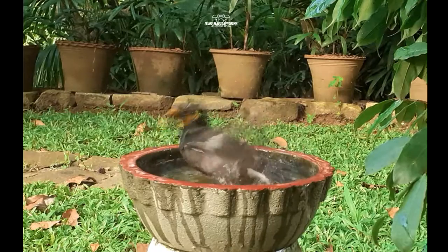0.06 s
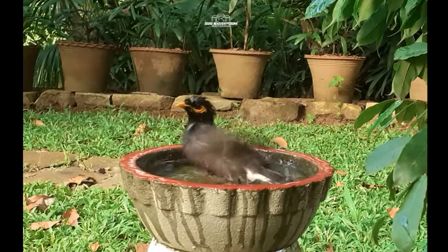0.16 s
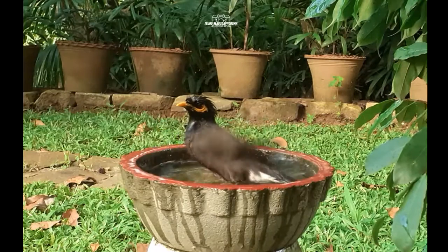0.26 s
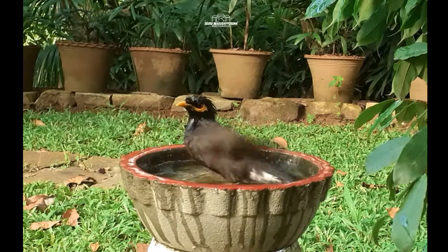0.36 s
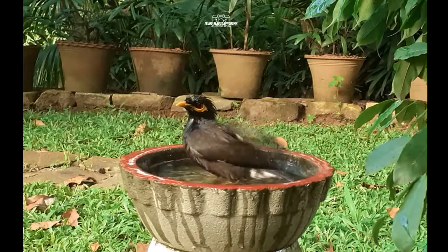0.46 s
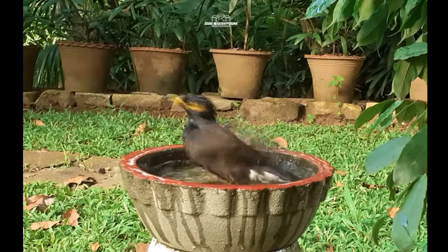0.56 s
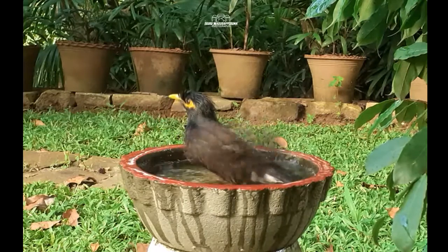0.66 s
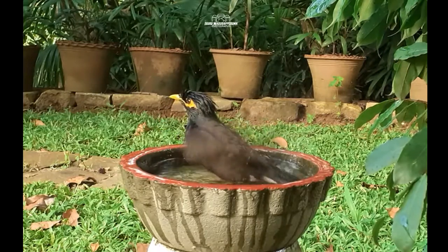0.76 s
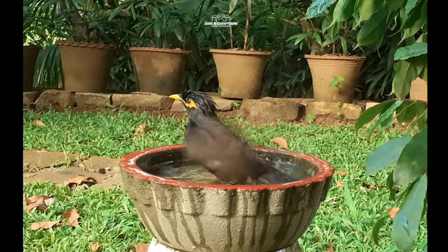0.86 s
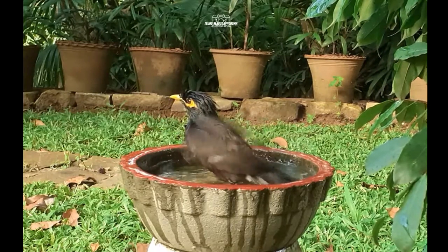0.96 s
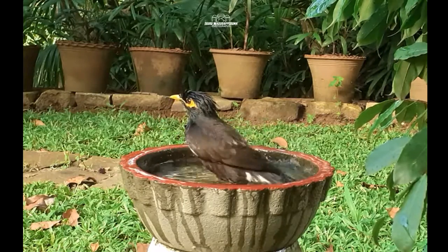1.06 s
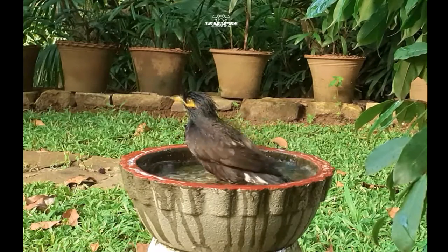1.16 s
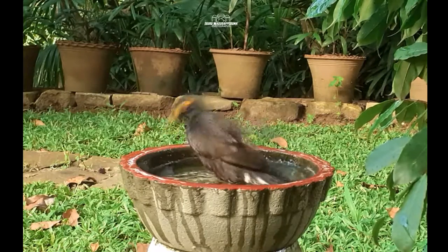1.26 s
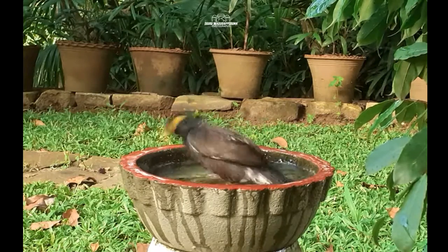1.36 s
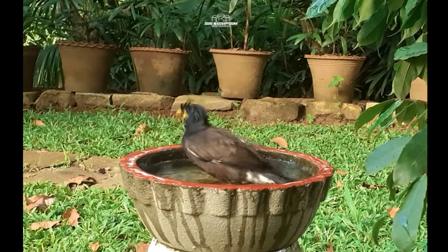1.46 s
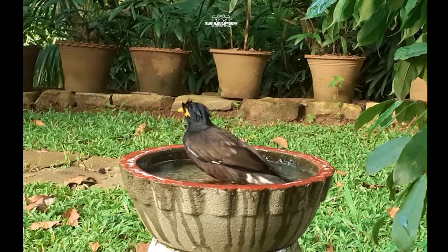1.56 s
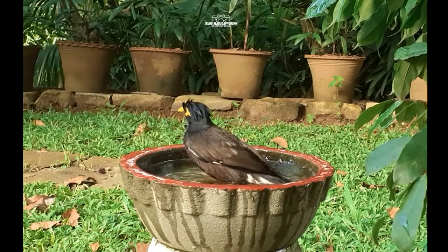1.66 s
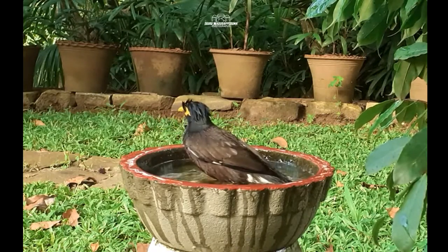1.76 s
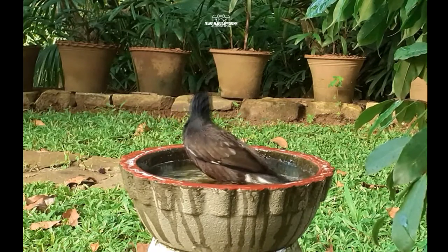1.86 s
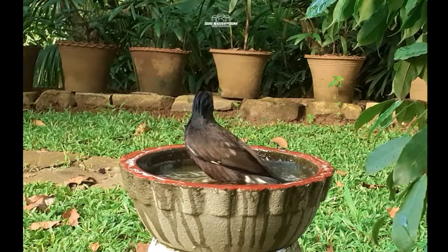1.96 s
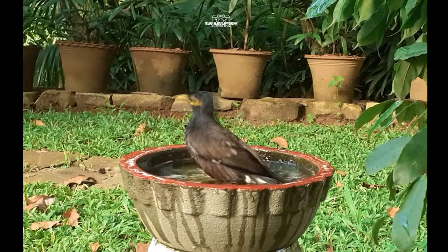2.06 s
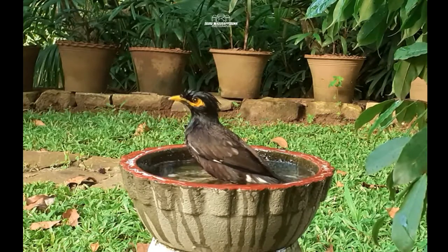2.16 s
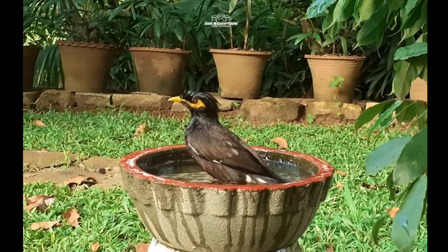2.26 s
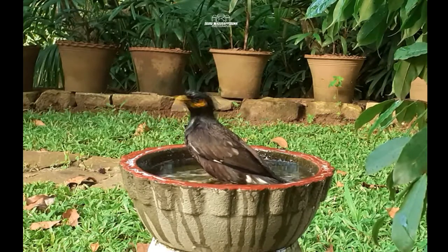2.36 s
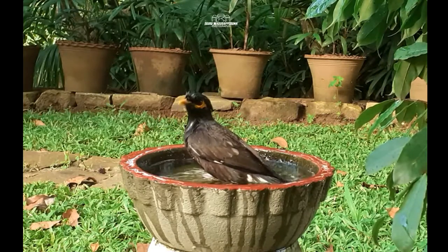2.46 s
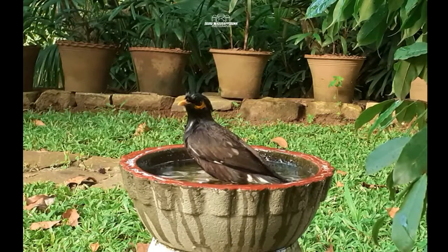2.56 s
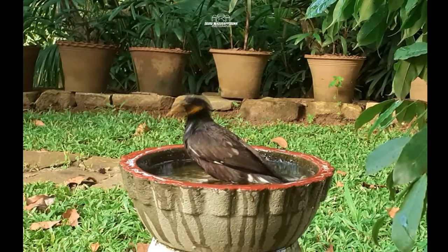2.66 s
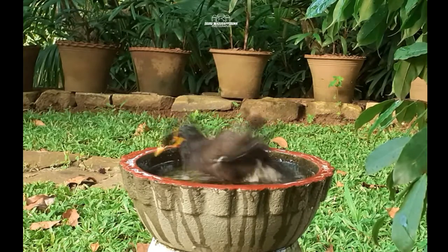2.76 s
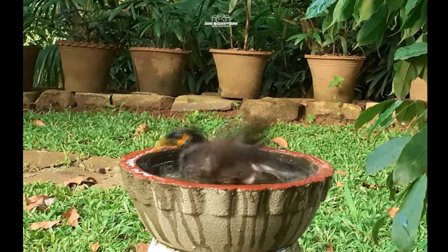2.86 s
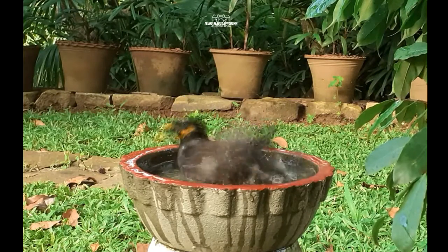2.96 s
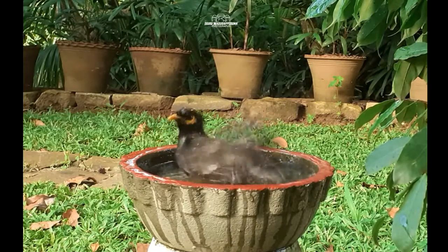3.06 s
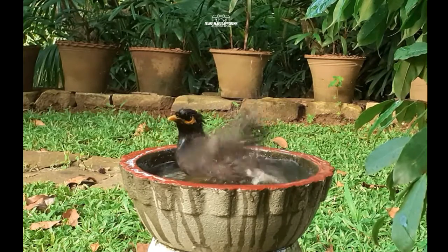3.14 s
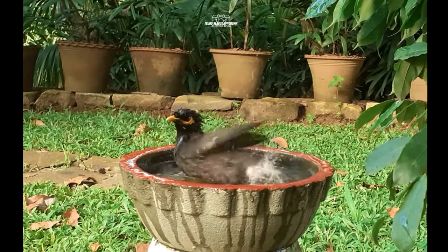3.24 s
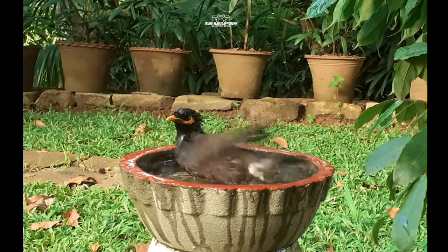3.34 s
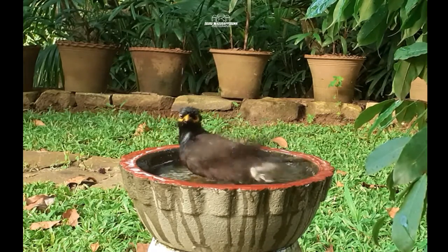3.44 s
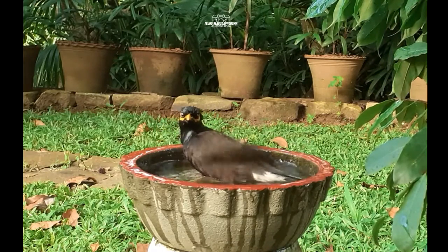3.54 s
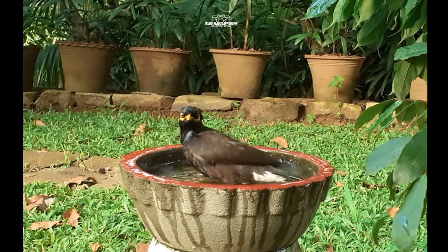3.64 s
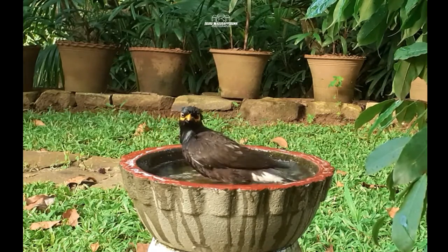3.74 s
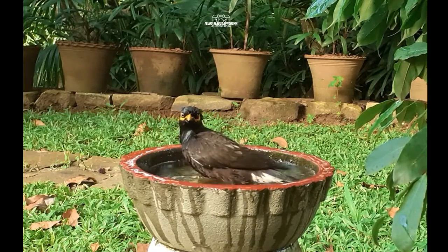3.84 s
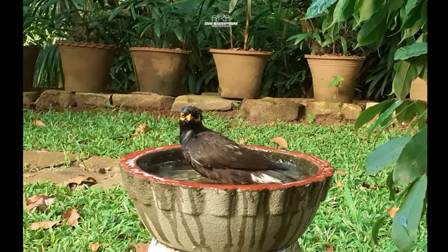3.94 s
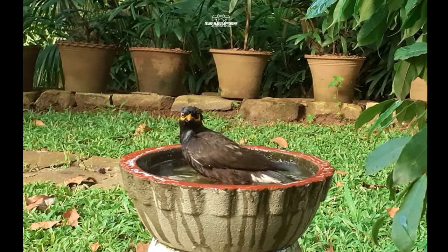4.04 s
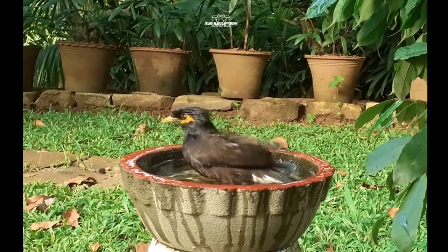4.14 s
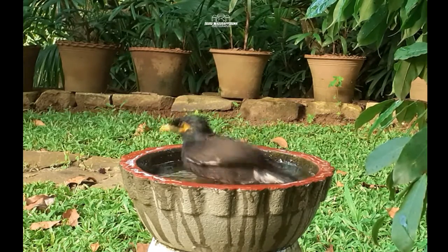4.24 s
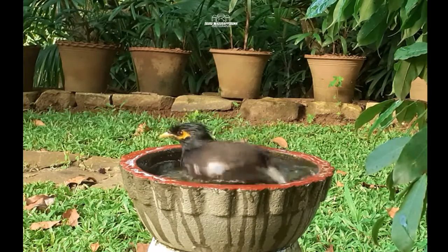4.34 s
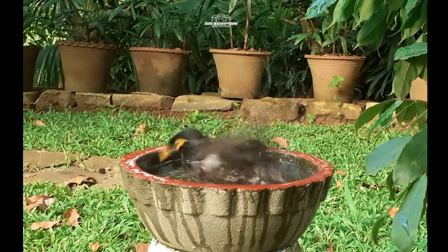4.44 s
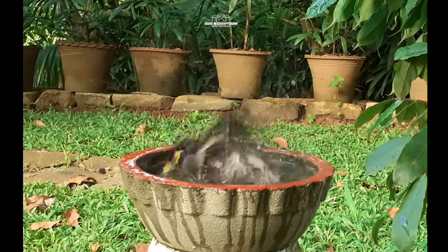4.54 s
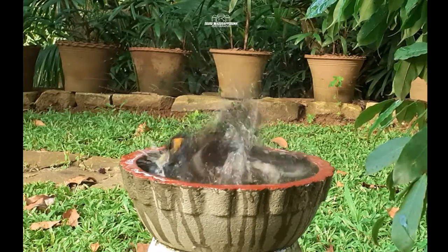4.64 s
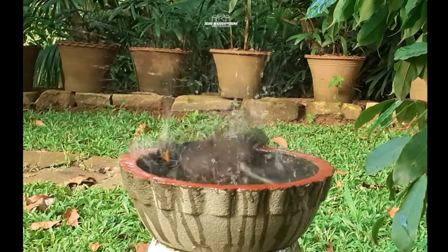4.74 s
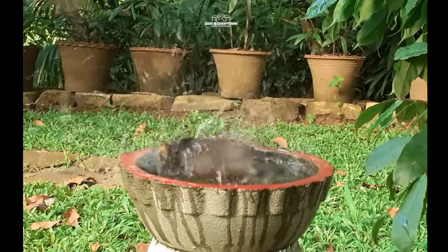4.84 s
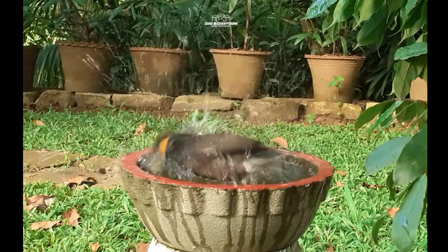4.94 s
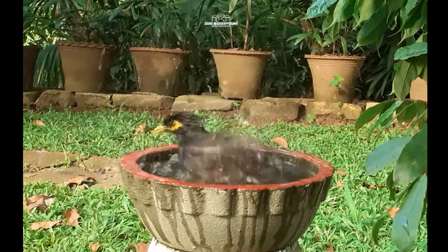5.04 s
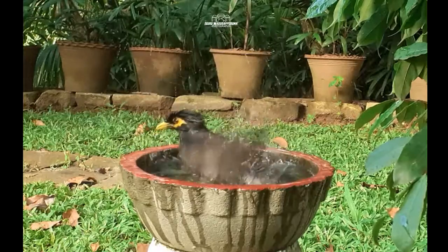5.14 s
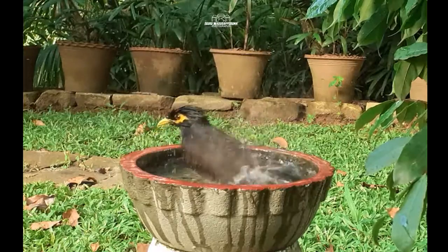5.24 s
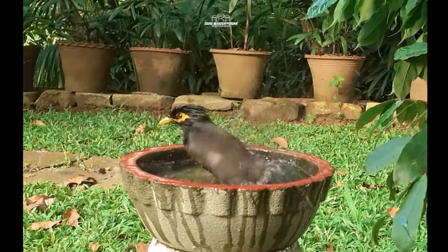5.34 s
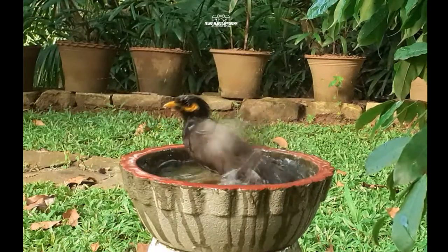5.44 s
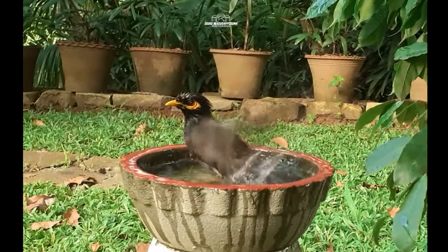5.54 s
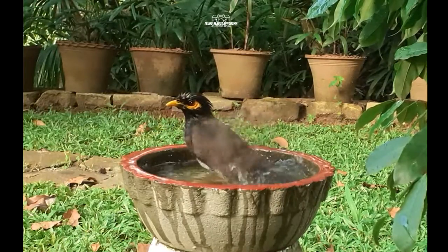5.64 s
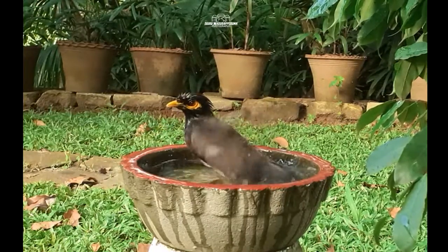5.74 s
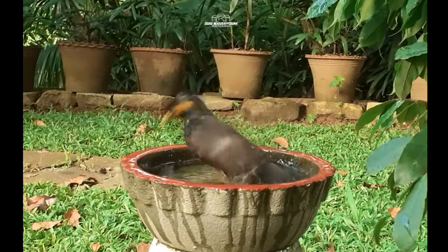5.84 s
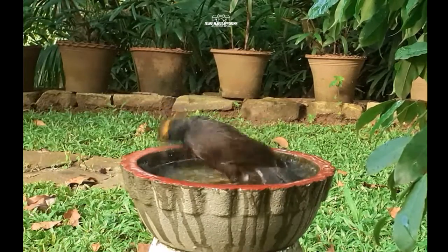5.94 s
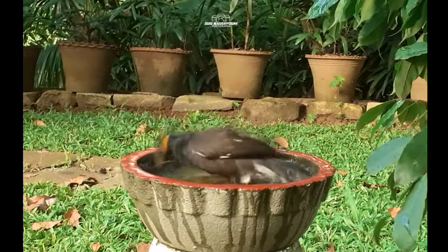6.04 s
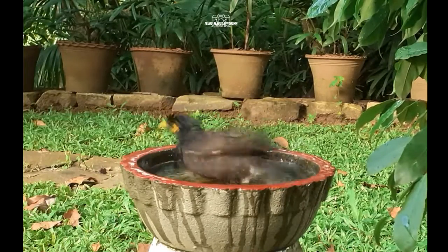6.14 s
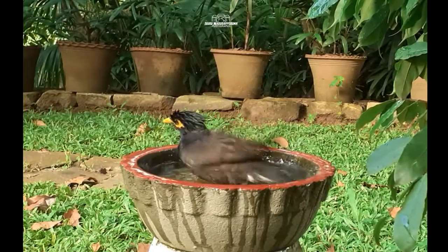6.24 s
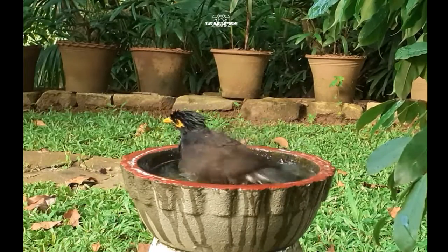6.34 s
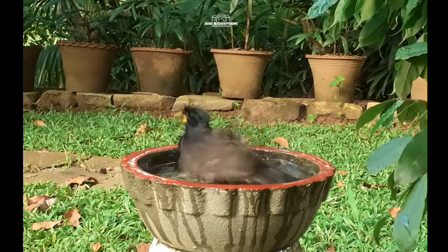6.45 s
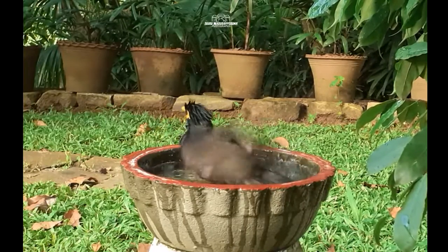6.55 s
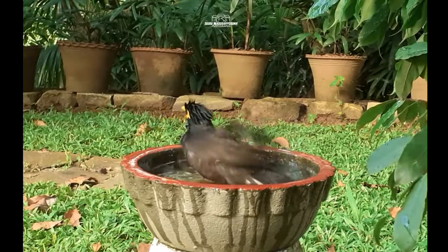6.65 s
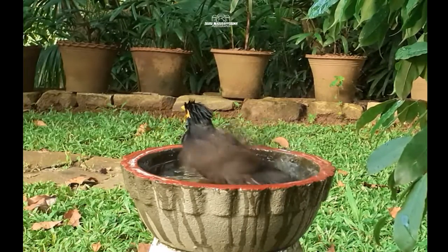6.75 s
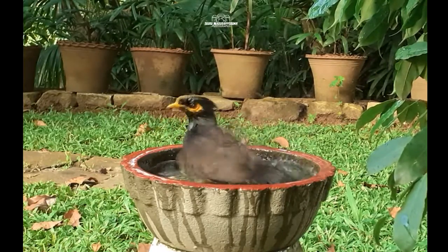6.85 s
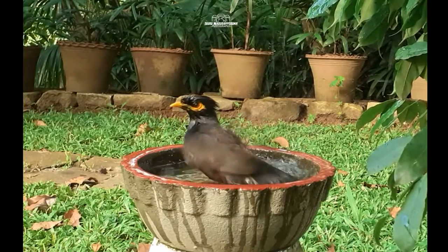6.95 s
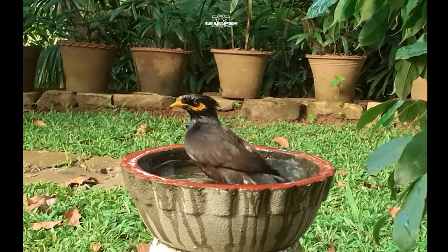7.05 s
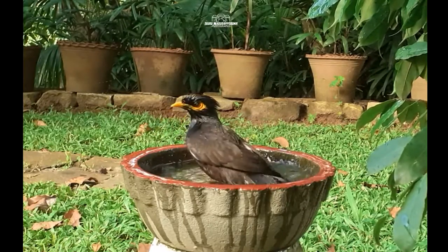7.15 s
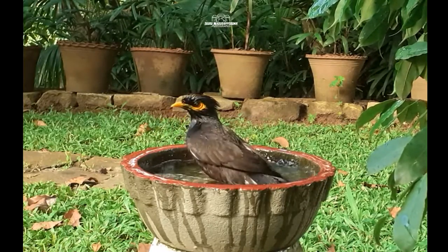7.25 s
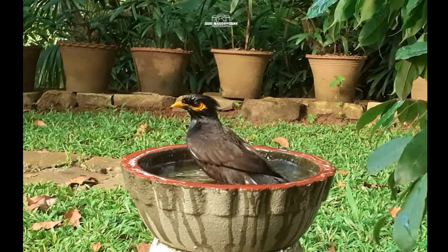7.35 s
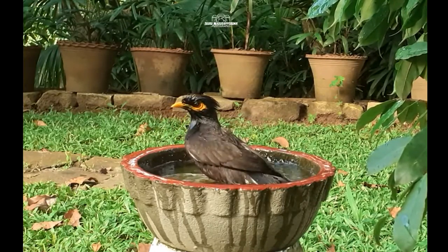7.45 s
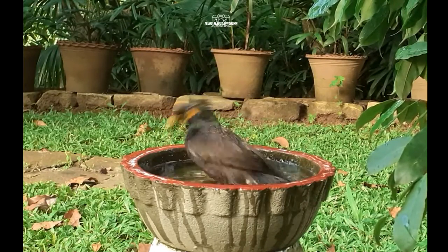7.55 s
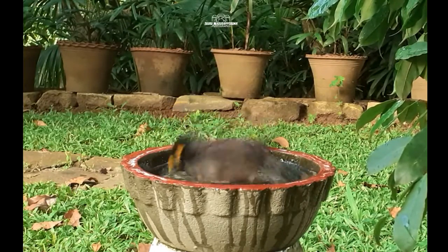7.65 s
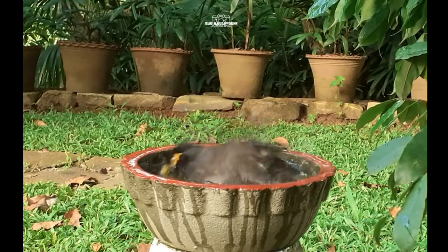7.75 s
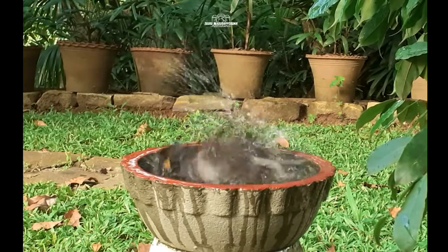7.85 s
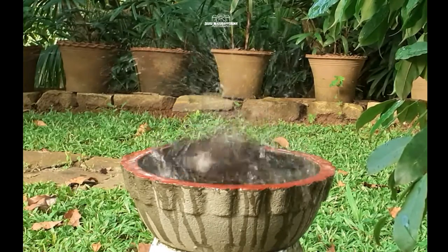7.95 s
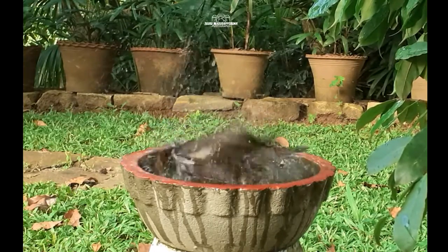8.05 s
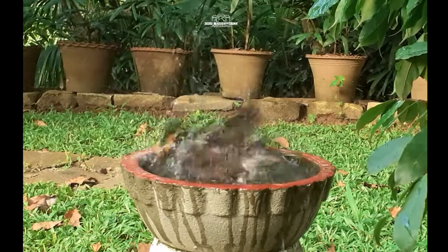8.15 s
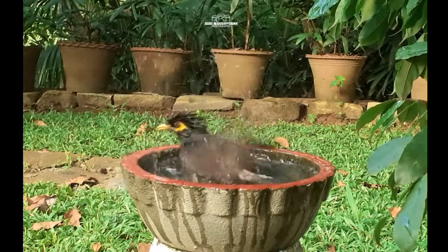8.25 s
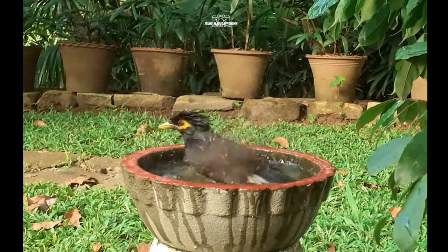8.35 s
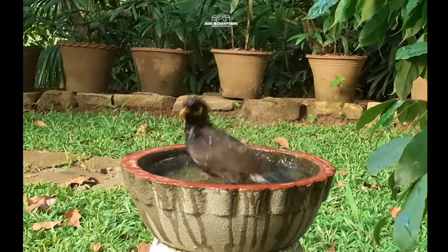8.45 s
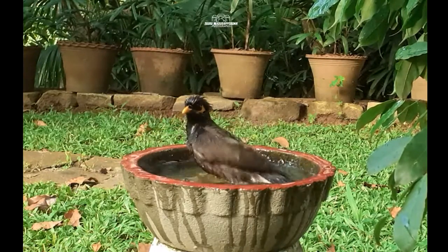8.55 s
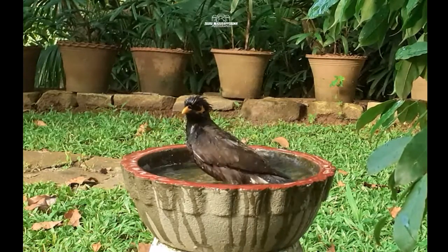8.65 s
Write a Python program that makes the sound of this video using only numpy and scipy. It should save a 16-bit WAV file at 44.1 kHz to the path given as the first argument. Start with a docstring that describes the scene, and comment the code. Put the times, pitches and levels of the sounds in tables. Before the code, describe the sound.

Quick wet wing flutters and bright spray burst from a small basin, with pauses showing faint animal hoots, bird piping and insect hiss.

```python
"""A myna bathes in a garden bird bath: its wings slap the water about twelve times a second, in bouts.
Slaps, thumps and spray are shaped noise; drops, bubbles and air pockets are damped, rising sines.
Far animals hoot (tones roughened by a random flutter); small birds chirp and pipe in the trees (gliding sines).
Insects hiss high over a low town rumble (filtered noise), with a far motor and passing traffic."""
import sys
import numpy as np
from scipy import signal
from scipy.fft import rfft, irfft, next_fast_len
from scipy.io import wavfile
from scipy.ndimage import uniform_filter1d, map_coordinates

SR = 44100
rng = np.random.default_rng(int(sys.argv[2]) if len(sys.argv) > 2 else 0)


def wav_record(signal):
    """Record a signal, one row per channel, as 16-bit PCM in the file named by sys.argv[1]."""
    frames = np.transpose(np.atleast_2d(signal))
    bounded = np.clip(frames, -1, 1)
    # unit amplitude maps onto the largest positive 16-bit level
    quanta = np.round(bounded * 32767).astype(np.int16)
    wavfile.write(sys.argv[1], SR, quanta)


N = 383661  # length in samples

# wing beats on the water; levels before the final mix: start_s, level_db, thump_db (against the beat)
WING_BEATS = [(0.049, -34.5, -14), (0.157, -44, -12.5), (0.326, -55, -19), (0.4373, -43.5, -13),
              (0.6973, -37.5, -16), (0.782, -31.5, -17.5), (0.7995, -35, -22), (0.8664, -31, -17.5),
              (.8823, -33, -19), (0.9639, -30, -16), (2.9773, -42.5, -19), (3.247, -31, -28),
              (4.5822, -47, -19), (4.679, -33, -25), (4.789, -33, -28), (4.842, -26, -24.5),
              (4.8989, -27, -30), (4.9534, -37, -21), (5.0232, -28.5, -80), (5.1423, -32.5, -17),
              (5.163, -28.5, -18), (5.2251, -29.5, -16), (5.3, -36, -21), (5.3944, -34, -17),
              (5.4016, -30, -14), (5.4731, -22.5, -21.5), (5.551, -21.5, -18), (5.628, -23, -17.5),
              (5.7105, -23, -19.5), (5.7873, -19.5, -23), (5.8749, -21, -19), (5.9735, -33.5, -16.5),
              (6.486, -33.5, -22), (6.574, -27, -28), (6.6442, -36.5, -14.5), (6.722, -42, -14),
              (6.8103, -35, -18), (6.884, -40, -15), (6.8986, -31, -18.5), (6.9721, -35.5, -18),
              (7.0911, -40, -52), (7.7131, -38, -18), (7.903, -26, -27), (7.965, -36, -22),
              (8.0914, -28, -28), (8.142, -26.5, -29)]
# spectrum of the water moving in the bowl: frequency_hz, level_db
BOWL_WATER = [(70, -16), (150, 3), (280, 4), (420, -8.5), (600, 6.5), (900, 7), (1200, -4), (1650, 4),
              (2400, -6.5), (4000, -25.5)]
# sound rattling between water and rim: frequency_hz, t60_s
BOWL_DECAY = [(500, 0.031), (4000, 0.18), (12000, 0.023)]
# sound scattered among the trees: frequency_hz, t60_s
TREE_DECAY = [(400, 0.57), (2500, 0.55), (8000, 0.2)]


def amp(db):
    """Level definition: decibels to amplitude gain."""
    return 10 ** (np.asarray(db) / 20)


def unit(x):
    """Normalisation: scale to rms 1."""
    return x / np.sqrt(np.mean(x ** 2) + 1e-20)


def along(points, hz):
    """Logarithmic interpolation: (Hz, value) points joined on a log frequency axis."""
    f, v = np.transpose(points)
    return np.interp(np.log(hz + 1), np.log(f + 1), v)


def wobble(rate):
    """Slow random modulation: a smooth curve through `rate` random knots a second."""
    knots = rng.standard_normal(int(N * rate / SR) + 4)
    return map_coordinates(knots, [np.arange(N) * rate / SR])


def filtered(x, response):
    """Linear filtering: the spectrum of x times a response of frequency."""
    m = next_fast_len(N + SR // 4)
    return irfft(rfft(x, m) * response(np.fft.rfftfreq(m, 1 / SR)), m)[..., :N]


def coloured(x, spectrum, size=1024):
    """Minimum-phase filtering: causal colouring that keeps the power of white noise."""
    cepstrum = irfft(np.log(amp(along(spectrum, np.fft.rfftfreq(size, 1 / SR)))))
    cepstrum[1:size // 2] *= 2  # fold the cepstrum onto positive time
    cepstrum[size // 2 + 1:] = 0
    kernel = irfft(np.exp(rfft(cepstrum)))
    return signal.oaconvolve(x, kernel[None] / np.linalg.norm(kernel), axes=1)[:, :N]


def add(track, s, sound):
    """Superposition: mix a sound into a track from time s."""
    start = max(round(s * SR), 0)
    part = track[..., start:start + sound.shape[-1]]
    part += sound[..., :part.shape[-1]]


def spread(pair, alike):
    """Interaural correlation: two unrelated signals become left and right of a given likeness."""
    turn = np.arccos(np.clip(alike, -1, 1)) / 2
    mid, side = np.cos(turn) * pair[0], np.sin(turn) * pair[1]
    return np.array([mid + side, mid - side])


def rush(spectrum):
    """Diffuse-field noise: stereo, rms 1, alike at both ears only in the bass."""
    # left-right likeness: frequency_hz, correlation
    likeness = [(60, 0.99), (130, 0.96), (290, 0.74), (640, 0.2), (1400, 0), (15000, 0)]
    hz = np.fft.rfftfreq(next_fast_len(N + 2), 1 / SR)
    pair = rng.standard_normal((2, len(hz))) + 1j * rng.standard_normal((2, len(hz)))
    shaped = spread(pair, along(likeness, hz)) * amp(along(spectrum, hz))
    return unit(irfft(shaped)[:, :N])


def crackle(spiky_db, alike):
    """Shot noise: countless tiny impacts of very unequal size, rms 1."""
    sizes = amp(spiky_db * np.clip(wobble(2500), -2, 2))
    return unit(spread(sizes * rng.standard_normal((2, N)), alike))


def echoes(x, decay):
    """Diffuse reverberation: a stereo noise tail in which each frequency dies at its own speed."""
    hz, t, z = signal.stft(rng.standard_normal((2, SR)), SR, nperseg=256)
    fading = z * amp(-60 * t / along(decay, hz)[:, None])
    tail = signal.istft(fading, SR, nperseg=256)[1]
    return signal.oaconvolve(np.atleast_2d(x), tail / np.linalg.norm(tail[0]), axes=1)[:, :N]


def bubbles(rate, centre_hz, scatter, cycles, size_db, count=400):
    """Bubble resonance: random small bubbles, each a damped sine that rises in pitch; rms 1."""
    draws = rng.random((int(rate * N / SR), 5))
    when, pitch, pitch2, size, pan = draws.T[:, :, None]
    hz = np.clip(centre_hz * np.exp(scatter * (pitch - pitch2)), 200, SR / 3)
    age = hz * np.arange(count) / SR / cycles
    strength = amp(size_db * np.minimum(-np.log(size), 3))
    phase = 2 * np.pi * cycles * age * (1 + 0.091 * np.minimum(age, 2))
    grains = strength * np.exp(-4 * age) * np.sin(phase)
    index = ((when * N).astype(int) + np.arange(count)).ravel()
    sides = [np.bincount(index, (grains * g).ravel(), N)[:N] for g in (pan, 1 - pan)]
    return unit(np.array(sides))


def background():
    """Superposed steady sources: motor partials, town and air noise, passing traffic, an insect band."""
    # low town rumble: frequency_hz, level_db
    town_spectrum = [(20, -54), (30, -28), (40, -5.5), (50, -0.5), (64, 1), (80, 3.5), (105, -4),
                     (150, -11.5), (250, -16), (450, -37), (900, -78)]
    # soft air: frequency_hz, level_db
    air_spectrum = [(250, -12), (450, 3.5), (700, 0.5), (1200, -4.5), (2200, -6.5), (3300, -9.5),
                    (5500, -7.5), (9000, -23), (14000, -63)]
    # insect chorus: frequency_hz, level_db
    insect_spectrum = [(5500, -25.5), (6600, -8), (7300, -2), (8000, -0.5), (8600, -7.5), (9400, -1.5),
                       (10000, 5.5), (10450, 9), (10900, 3.5), (11500, -5), (12500, -68), (15000, -113)]
    # far traffic: frequency_hz, level_db
    traffic_spectrum = [(60, -1), (130, 6.5), (200, -5.5), (320, -2), (450, -13.5), (900, -43)]
    # partials of a far motor: pitch_hz, rms_level_db
    motor_partials = [(50.5, -60), (80, -62), (305, -76.5)]
    # far traffic passing: nearest_s, level_db, fade_s (time to fall by 3 dB)
    passes = [(1.3, -64, 0.45), (4.199, -63.5, .5), (8.7, -57.5, 0.66)]
    t = np.arange(N) / SR
    motor = np.zeros(N)
    for hz, db in motor_partials:
        level = np.sqrt(2) * amp(db + wobble(8.2))
        motor += level * np.sin(2 * np.pi * hz * t + 0.83 * wobble(11))
    town = amp(-55.5) * rush(town_spectrum)
    passing_power = sum(amp(db) ** 2 / (1 + ((t - s) / fade) ** 2) for s, db, fade in passes)
    traffic = np.sqrt(passing_power) * rush(traffic_spectrum)
    air = amp(-69.0 + 2.7 * wobble(3.24)) * rush(air_spectrum)
    insects = amp(-56.5 + 0.18 * wobble(3.3) + 0.66 * wobble(65)) * rush(insect_spectrum)
    return motor + town + traffic + air + insects


def hoots():
    """Random modulation of a tone: arched calls begin and end pure and turn hoarse at their height."""
    # far animals, some overlapping; levels before the final mix: start_s, length_s, top_pitch_hz,
    # opening_scoop and closing_drop (shares of the pitch), fall_s, level_db, hoarseness (0-1)
    hoot_calls = [(.13, 0.13, 608, .12, .01, .05, -54.5, 0.4), (.315, 0.18, 641, .2, 0.11, .07, -49, 0.5),
                  (.45, .47, 648.6, 0.081, 0.12, 0.27, -48, 0.31),
                  (.5, 0.54, 770, 0.049, .21, 0.37, -56.5, 0.93),
                  (1.16, 0.63, 652, 0.104, 0.21, .3, -48, 0.25),
                  (1.222, 0.73, 746, 0.019, 0.14, 0.3, -55.5, 0.87),
                  (2.11, 0.17, 632, .1, .02, .05, -66, 0.81), (2.25, .62, 736, 0.181, .22, .37, -56.5, 1),
                  (3.23, 0.49, 696.5, .15, 0.13, .27, -58.5, 1),
                  (3.825, 0.12, 426.5, .02, .02, 0.071, -57.5, 0.33),
                  (4.155, 0.14, 426, 0.022, .03, .06, -64, 0.32),
                  (6.268, .74, 663, .12, .12, .33, -64.5, 0.9), (7.302, .57, 655, .12, .12, .28, -67, 0.95)]
    rise_s, edge_s = 0.0843, 0.037  # effort builds; the voice fades in and out
    slack_db = -7.5  # change of level with no effort left
    waver_share, waver_db = 0.0061, 1.56  # unsteadiness of pitch and level
    clear_rate, hoarse_rate = 110, 150  # flutter, knots a second
    fringe, fringe_rate = 0.3, 380  # a weaker, faster flutter feathers the tone: share, knots a second
    depth = 2.3  # flutter of a fully hoarse voice
    out = np.zeros(N)
    for s, length, top_hz, scoop, drop, fall, db, hoarseness in hoot_calls:
        t = np.arange(int(length * SR)) / SR
        opening = np.maximum(1 - t / rise_s, 0) ** 1.52
        closing = np.maximum(1 - (length - t) / fall, 0) ** 2
        slack = np.maximum(opening, closing)
        waver = map_coordinates(rng.standard_normal(SR // 500), [t * 28])
        pitch = top_hz * (1 - scoop * opening - drop * closing + waver_share * waver)
        hoarse = depth * hoarseness * (1 - slack) ** 2
        rate = np.interp(hoarseness, [0, 1], [clear_rate, hoarse_rate])
        knots = rng.standard_normal(SR // 50) + 1j * rng.standard_normal(SR // 50)
        flutter = map_coordinates(knots, [t * rate])
        flutter = flutter + fringe * map_coordinates(knots[::-1], [t * fringe_rate])
        edges = np.minimum(np.minimum(t, length - t) / edge_s, 1)
        level = amp(db + slack_db * slack + waver_db * waver) * edges
        voice = (1 + hoarse * flutter) / np.sqrt(.5 + hoarse ** 2)
        tone = np.exp(2j * np.pi * np.cumsum(pitch) / SR)
        add(out, s, level * np.real(voice * tone))
    return out


def whistle(length, pitches, turn, octave_db, rasp):
    """Frequency modulation: a note and its octave glide to a turning pitch and away; rasp shakes them."""
    u = np.linspace(0, 1, int(length * SR))
    knots = np.arange(len(u)) * 900 / SR
    quiver = rasp * map_coordinates(rng.standard_normal(SR // 100), [knots])
    corners = np.interp(u, [0, np.clip(turn, .1, .9), 1], pitches)
    glide = uniform_filter1d(corners, len(u) // 5, mode="nearest")
    phase = 2 * np.pi * np.cumsum(glide * (1 + quiver)) / SR
    return signal.windows.tukey(len(u), .3) * (np.sin(phase) + amp(octave_db) * np.sin(2 * phase))


def piping():
    """Gliding tones: a bird's short notes slide up a little and level off, swelling and then slowing."""
    # notes, levels before the final mix: start_s, top_pitch_hz, level_db
    notes = [(6.34, 2334, -61), (6.465, 2330, -59), (6.582, 2375, -53.5), (6.697, 2387, -53.5),
             (6.822, 2400, -53.5), (6.948, 2450, -51), (7.072, 2450, -50.5), (7.2, 2445, -52),
             (7.343, 2440, -54.5), (7.492, 2435, -56), (7.655, 2420, -55), (7.86, 2380, -52),
             (8.099, 2390, -52), (8.49, 2364, -58.5)]
    # start, top and end of each note, as shares of its top pitch
    note_shape = [.945, 1.0, .997]
    out = np.zeros(N)
    for s, hz, db in notes:
        note = whistle(.068, hz * np.array(note_shape), turn=.55, octave_db=-45, rasp=.02)
        add(out, s, amp(db) * note)
    return out


def garden_calls():
    """Direct and reverberant sound: each chirp has its own direct share beside the trees' scattering."""
    # small birds, levels before the final mix: start_s, length_s, start_hz, turn_hz, end_hz,
    # turn (share of the length), level_db, octave_db, rasp (share of the pitch), direct (share 0-1)
    chirps = [(0.427, 0.018, 1930, 1800, 1760, 0.5, -62, -22, .02, 0.8),
              (.488, 0.021, 2080, 1830, 1680, 0.43, -64.5, -24, .02, 1),
              (1.669, .11, 2640, 3180, 3160, 0.76, -67.5, -28, 0.062, 0.36),
              (1.892, 0.056, 2024, 2400, 2460, 0.57, -64.5, -28, 0.09, 0.5),
              (1.944, 0.057, 2465, 2130, 2064, 0.5, -71, -24, .018, 0.8),
              (1.953, 0.033, 3340, 3218, 3190, 0.58, -65, -3, 0.016, 1),
              (4.295, .02, 3740, 3680, 3600, .5, -66.5, 11, .01, 0.63),
              (4.323, 0.037, 3480, 3300, 3210, 0.46, -53, 3.5, 0.018, 0.6),
              (4.393, 0.046, 3130, 3050, 2900, 0.43, -60.5, 9.5, 0.05, 0.2),
              (6.023, 0.047, 3830, 3579, 3430, 0.68, -60.5, 3, 0.028, 0.56),
              (7.581, 0.054, 6380, 6400, 5240, 0.32, -53.5, -20, 0.018, 0.5),
              (7.696, 0.058, 5600, 6050, 6300, 0.43, -56, -28, .02, 0.7),
              (7.758, 0.05, 6240, 6230, 5400, 0.27, -53, -30, 0.0074, 0.9),
              (7.949, .023, 5130, 5750, 4420, 0.47, -54, -33, .008, 1),
              (8.038, 0.065, 4660, 5820, 4670, 0.49, -49, -34, .008, 0.9),
              (8.112, 0.13, 3010, 2740, 2710, 0.47, -51.5, -30, 0.08, 0.56),
              (8.393, 0.036, 4200, 4250, 4400, 0.53, -59, -30, 0.022, 0.7),
              (8.42, 0.06, 4500, 5320, 4740, 0.52, -51, -21, 0.023, 0.56),
              (8.467, 0.043, 5000, 4800, 4600, .5, -54.5, -30, 0.11, 0.35),
              (8.488, 0.069, 2542, 2350, 2310, 0.4, -59.5, -30, 0.075, 0.7)]
    ear_lag_s = 0.00038  # the hooters are off to one side: delay between the ears
    near, far = np.zeros(N), np.zeros(N)
    for s, length, start_hz, turn_hz, end_hz, turn, db, octave_db, rasp, in_sight in chirps:
        note = amp(db) * whistle(length, [start_hz, turn_hz, end_hz], turn, octave_db, rasp)
        add(near, s, in_sight * note)
        add(far, s, note)
    pipes, hooting = piping(), hoots()
    lagging = np.array([[1], [0]])  # left is delayed
    ears = filtered(hooting, lambda hz: np.exp(-2j * np.pi * hz * ear_lag_s * lagging))
    direct = amp(3.5) * near + .62 * pipes + ears * amp([[1.6], [-1.2]])
    scattered = amp(-1.0) * far + .62 * pipes + amp(-4.5) * hooting
    return direct + echoes(scattered, TREE_DECAY) * amp([[1], [-1]])  # left 1 dB up, right 1 dB down


def wing_air():
    """Aerodynamic noise: every wing stroke fans a soft, low puff of air."""
    # fanned air: frequency_hz, level_db
    puff_spectrum = [(30, -45), (50, -9), (75, -11), (110, -6), (200, -15.5), (500, -31)]
    average_puff_db, half_width_s = -58.5, 0.02
    growth = 0.58  # dB of puff per dB of the beat
    t = np.arange(N) / SR
    s, db, _ = np.transpose(WING_BEATS)
    nearest = np.searchsorted((s[1:] + s[:-1]) / 2, t)
    level = amp(average_puff_db + growth * (db - db.mean()))
    puffs = level[nearest] * np.exp(-((t - s[nearest]) / half_width_s) ** 2)
    return puffs * rush(puff_spectrum)


def laps():
    """Surface waves: as the bird shifts its weight, wavelets wash the rim with a few small bubbles."""
    # wavelets, levels before the mix of wash and bubbles: centre_s, half_width_s, level_db
    wavelets = [(2.87, 0.015, -70), (3.06, .03, -63), (3.442, .007, -61), (3.52, .018, -66.5),
                (3.915, 0.037, -65.5), (4.06, 0.015, -64), (4.25, 0.033, -69.5), (4.39, .03, -66.5),
                (4.57, .02, -60), (4.655, 0.013, -56), (7.77, .012, -59.5), (8.415, 0.015, -57.5)]
    # wash of a wavelet: frequency_hz, level_db
    wash_spectrum = [(400, -9), (700, -6), (1000, 3), (1300, -8), (1700, 2), (2300, -5), (4000, -19)]
    t = np.arange(N) / SR
    level = sum(amp(db) * np.exp(-((t - s) / width) ** 2) for s, width, db in wavelets)
    wash = coloured(crackle(spiky_db=3.5, alike=0.55), wash_spectrum)
    fizz = bubbles(rate=300, centre_hz=1380, scatter=0.48, cycles=14, size_db=6, count=800)
    return level * (amp(-3.5) * wash + amp(-7) * fizz)


def stirring():
    """Build-up and decay: strength of spray, slosh and feather mist as each bout builds, holds and settles."""
    # churning and shaking, levels before the final mix: start_s, end_s, spray_db, slosh_db, mist_db
    bouts = [(0, 0.12, -69, -75, -59), (0.323, .62, -83, -75, -62), (0.733, 0.995, -61, -71.5, -67),
             (3.025, 3.193, -64.5, -74.5, -56), (3.85, 4.4, -86, -73, -99), (4.562, 4.773, -55, -65.5, -52),
             (4.804, 4.984, -57, -68, -72), (5.146, 5.67, -55.5, -68.5, -68), (5.78, 5.863, -62, -71, -60),
             (6.165, 6.452, -62.5, -71, -88), (6.477, 6.93, -58, -67.5, -74),
             (7.808, 8.178, -55, -65.5, -53), (8.237, 8.535, -57.5, -64, -58.5)]
    rise_db_per_s, fall_db_per_s = 102, 56  # the water is stirred up quickly and settles more slowly
    t, levels = np.arange(N) / SR, np.zeros((3, N))
    for start, end, *db in bouts:
        before, after = np.maximum(start - t, 0), np.maximum(t - end, 0)
        shape_db = -rise_db_per_s * before - fall_db_per_s * after
        levels = np.maximum(levels, amp(db)[:, None] * amp(shape_db))
    return levels


def feathers(level):
    """Droplet shot noise: wet feathers shaken clear of the water flick a fine, bright mist."""
    # flicked mist: frequency_hz, level_db
    flick_spectrum = [(3500, -23), (5200, 1.5), (8000, 7), (13000, 6), (16000, -13)]
    mist = coloured(crackle(spiky_db=7.0, alike=0.041), flick_spectrum)
    return level * amp(4.7 * wobble(53)) * mist


def churn(spray, slosh):
    """Impacts and bubble resonance: spray patters back while larger bubbles slosh and gurgle in the bowl."""
    # fine spray: frequency_hz, level_db
    fine_spectrum = [(2000, -33), (4000, -2), (5400, 6), (8000, 2), (13000, 1.5), (16000, -12)]
    # heavy drops: frequency_hz, level_db
    heavy_spectrum = [(1200, -39), (2000, 1.5), (3300, 5.5), (5000, -8), (8000, -20), (16000, -41)]
    vigour = np.minimum(spray / amp(-50.5), 1)  # gentle shaking flicks mist; hard shaking adds heavy drops
    clumps = amp(3.5 * wobble(70))
    mist = amp(1.3) * coloured(crackle(spiky_db=5.5, alike=.05), fine_spectrum)
    heavy = amp(-2) * coloured(crackle(spiky_db=5.5, alike=.45), heavy_spectrum)
    patter = bubbles(rate=240, centre_hz=5000, scatter=.8, cycles=13, size_db=6)
    wash = amp(-0.5 + 2.8 * wobble(50)) * coloured(crackle(spiky_db=5, alike=0.27), BOWL_WATER)
    plips = amp(1.5) * bubbles(rate=150, centre_hz=2050, scatter=.65, cycles=20, size_db=4.5, count=1000)
    gurgle = amp(-3.5) * bubbles(rate=80, centre_hz=520, scatter=1.1, cycles=9, size_db=3, count=1800)
    thrown = clumps * (mist + vigour * heavy) + np.maximum(vigour, .5) * patter
    stirred = wash + gurgle + np.maximum(vigour, .45) * plips
    return spray * thrown + slosh * stirred


def drops():
    """Bubble resonance: a drop ticks and rings its trapped bubble for a few cycles; the bowl's rim answers."""
    # single drops and bubbles that stand out: start_s, level_db, starting_pitch_hz, ring_t60_s
    single_drops = [(.143, -38, 7100, .003), (.423, -41, 5800, .004), (.561, -37, 7800, .0027),
                    (.712, -40, 3520, .024), (.8, -25.5, 5360, .009), (2.885, -35, 8360, .003),
                    (2.984, -42, 5380, .012), (3.249, -17, 7540, .0021), (3.44, -35, 8850, .002),
                    (4.445, -31, 8500, .002), (4.517, -46, 1750, .012), (4.583, -34.5, 3330, .013),
                    (4.601, -44, 3230, .015), (4.68, -35.5, 2040, .026), (4.717, -41, 4870, .018),
                    (4.726, -45, 1720, .015), (4.73, -40, 2300, .015), (4.777, -42, 3190, .012),
                    (4.79, -31, 3600, .008), (4.8413, -26, 3400, .019), (4.842, -25, 4300, .017),
                    (4.855, -45, 1620, .016), (4.898, -33, 5470, .018), (4.952, -29, 7000, .003),
                    (4.965, -42, 2800, .014), (5.006, -41, 3920, .009), (5.022, -39, 3400, .012),
                    (5.131, -26, 6000, .002), (5.162, -36, 4450, .014), (5.166, -35, 4760, .012),
                    (5.225, -40, 1720, .02), (5.226, -41, 2070, .018), (5.267, -46, 1750, .016),
                    (5.299, -43, 1720, .014), (5.346, -46, 1750, .033), (5.394, -36, 3450, .014),
                    (5.474, -34, 1660, .012), (5.2277, -27, 6000, .002), (5.4656, -31, 7000, .002),
                    (5.4736, -21, 7500, .0015), (5.533, -28, 5170, .002), (5.557, -28, 4500, .003),
                    (5.6123, -30, 6500, .002), (5.691, -29, 4950, .0022), (5.7, -33, 5500, .003),
                    (5.7086, -27, 4200, .005), (5.7794, -33, 7000, .002), (5.8572, -33, 6000, .002),
                    (5.71, -37, 1800, .014), (5.7885, -33, 1700, .011), (5.789, -32, 2450, .009),
                    (5.8755, -37, 1900, .012), (6.577, -35, 5450, .009), (6.899, -38, 4480, .012),
                    (7.175, -14.5, 6050, .0012), (7.387, -37, 6750, .0036), (7.713, -44, 1680, .014),
                    (7.732, -38, 4000, .004), (7.8285, -50, 1580, .025), (7.845, -47, 1620, .025),
                    (7.902, -35, 5550, .012), (7.903, -37, 3190, .012), (7.915, -42, 1765, .018),
                    (7.967, -39, 4400, .02), (7.999, -45, 2540, .014), (8.0236, -46, 1720, .025),
                    (8.041, -42, 2800, .01), (8.0412, -21.5, 5240, .0033), (8.092, -21, 4150, .017),
                    (8.0905, -42, 1590, .016), (8.149, -37, 3790, .014), (8.16, -39, 2150, .016),
                    (8.329, -50, 1830, .02), (8.33, -25, 8800, .0017)]
    out, t, sides = np.zeros((2, N)), np.arange(SR // 25) / SR, np.array([[1], [-1]])
    places = 2 * rng.random(len(single_drops)) - 1
    for (s, db, hz, t60), place in zip(single_drops, places):
        phase = 2 * np.pi * hz * t * (1 + 2 * t) + .5 * place * sides  # the nearer ear leads in phase
        swing = np.sin(phase) * amp(-60 * t / t60) * (1 - np.exp(-t * hz / .4))
        ring = np.diff(swing, prepend=0) * SR / (2 * np.pi * hz)  # the slope of the swing is heard
        add(out, s, amp(db + 2 * place * sides) * ring)
    return out + amp(-15) * echoes(out, BOWL_DECAY)


def pockets():
    """Cavity resonance: air pushed under by a wing or the breast plops low and briefly, rising in pitch."""
    # air pockets: start_s, level_db, starting_pitch_hz, ring_t60_s
    air_pockets = [(4.568, -53, 610, .03), (4.777, -53, 600, .025), (5.146, -43, 820, 0.025),
                   (5.176, -43.5, 430, .03), (5.225, -40, 720, 0.035), (5.4015, -43, 750, 0.021),
                   (5.4735, -37.5, 660, 0.022), (5.535, -50, 805, .03), (5.551, -41, 816, 0.019),
                   (5.6285, -34, 700, 0.022), (5.692, -45, 725, 0.018), (5.7105, -35, 884, 0.021),
                   (5.788, -34.5, 910, 0.018), (5.875, -35, 793, 0.019), (5.974, -41.5, 990, 0.02),
                   (7.901, -48, 602, 0.031), (7.986, -47.5, 890, 0.027), (8.066, -52, 285, 0.055),
                   (8.142, -50, 870, .03), (8.206, -52, 855, .04), (8.358, -52, 314, .06),
                   (8.416, -53, 700, .035), (8.469, -50, 292, 0.054), (8.635, -45, 300, 0.047)]
    glide_per_s = 3.8  # pitch climbs as a pocket nears the surface: share a second
    out, t = np.zeros(N), np.arange(SR // 12) / SR
    for s, db, hz, t60 in air_pockets:
        phase = 2 * np.pi * hz * t * (1 + glide_per_s * t / 2)
        add(out, s, amp(db - 60 * t / t60) * (1 - np.exp(-2 * t * hz)) * np.sin(phase))
    return out + amp(-11) * echoes(out, BOWL_DECAY)


def crack():
    """Impulsive impact: a flat wing claps the water, a short noise burst nearly alike at both ears, peak 1."""
    t = np.arange(SR // 100) / SR
    burst = spread(rng.standard_normal((2, len(t))), 0.68) * amp(-60 * t / 0.0071)
    return burst / np.abs(burst).max()


def wings():
    """Impact on a liquid: each beat swishes, cracks on the surface, thumps the bowl's water and throws spray."""
    # bright slap of a wing: frequency_hz, level_db
    slap_spectrum = [(900, -29), (1600, -5), (3000, -4.5), (5200, 1.5), (8000, 2.5), (11500, 2),
                     (16000, -4)]
    blow_db, crack_db = -12, .3  # spray burst and surface crack, against the beat
    blow_t60_s, thump_t60_s = .04, 0.027  # the bowl's water answers the blow briefly
    average_swish_db, swish_growth = -45.5, 0.65  # growth in dB per dB of the blow
    swish_rise_s, swish_fall_s = 0.012, 0.014
    thump_swish_db = -2  # the bowl's water answers the swish only weakly
    gulp_db = -9.5  # large air pockets, against the thump
    lead_s = .06  # the swish starts ahead of the blow
    bright, deep = np.zeros(N), np.zeros(N)  # powers
    claps, knocks = np.zeros((2, N)), np.zeros((2, N))
    t = np.arange(SR // 4) / SR - lead_s
    after = np.maximum(t, 0)
    average_db = np.mean(WING_BEATS, axis=0)[1]
    blow = (t >= 0) * amp(blow_db - 60 * after / blow_t60_s)
    push = (t >= 0) * amp(blow_db - 60 * after / thump_t60_s)
    swish = np.where(t < 0, 0.63 * np.exp(t / swish_rise_s), np.exp(-after / swish_fall_s))
    for s, db, thump_db in WING_BEATS:
        swish_db = average_swish_db + swish_growth * (db - average_db)
        first = max(round((lead_s - s) * SR), 0)  # skip what would precede the start
        bright_power = (amp(db) * blow) ** 2 + (amp(swish_db) * swish) ** 2
        deep_power = (amp(db) * push) ** 2 + (amp(swish_db + thump_swish_db) * swish) ** 2
        add(bright, s - lead_s, bright_power[first:])
        add(deep, s - lead_s, deep_power[first:] * amp(thump_db) ** 2)
        clap = amp(db + crack_db) * crack()
        add(claps, s, clap)
        add(knocks, s, clap * amp(thump_db))
    grain = amp(3 * np.clip(wobble(420), -2, 2))
    droplets = unit(grain * crackle(spiky_db=4.5, alike=.1))
    splash = coloured(claps + np.sqrt(bright) * droplets, slap_spectrum)
    thump = coloured(knocks + np.sqrt(deep) * crackle(spiky_db=-2, alike=1.0), BOWL_WATER)
    froth = np.sqrt(bright) * bubbles(rate=900, centre_hz=4720, scatter=0.85, cycles=10, size_db=6.0)
    gulps = np.sqrt(deep) * bubbles(rate=350, centre_hz=1750, scatter=.3, cycles=12, size_db=4, count=700)
    return amp(1.0) * splash + amp(9.0) * (thump + amp(gulp_db) * gulps) + amp(-10.0) * froth


def scene():
    """Direct-to-reverberant balance: the bath close by and nearly dry, with the garden around it."""
    spray, slosh, mist = stirring()
    water = wings() + pockets() + drops() + laps() + churn(spray, slosh) + feathers(mist)
    return water + amp(-12) * echoes(water, TREE_DECAY) + wing_air() + garden_calls() + background()


def record(dry):
    """Band limiting: nothing above 16300 Hz is kept."""
    return filtered(dry, lambda hz: hz < 16300)


dry = scene()
out = record(dry)
wav_record(out)
```